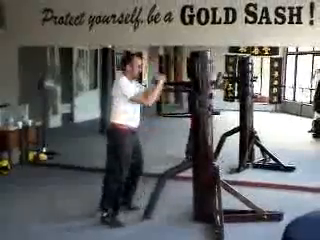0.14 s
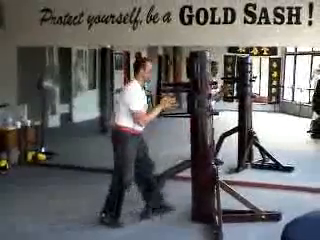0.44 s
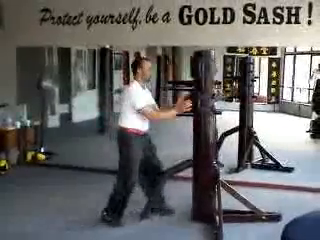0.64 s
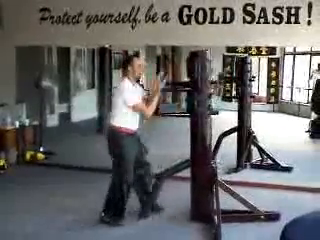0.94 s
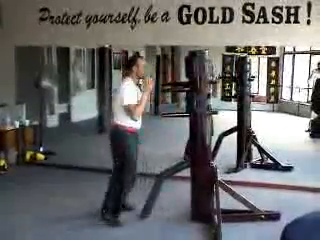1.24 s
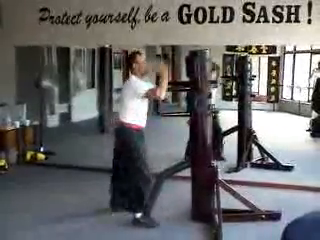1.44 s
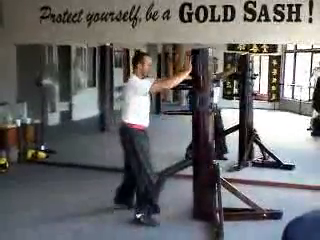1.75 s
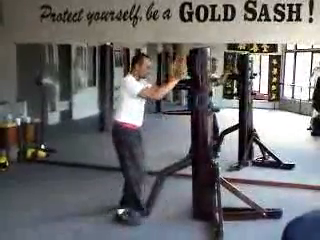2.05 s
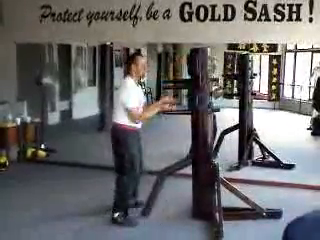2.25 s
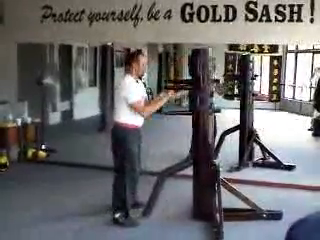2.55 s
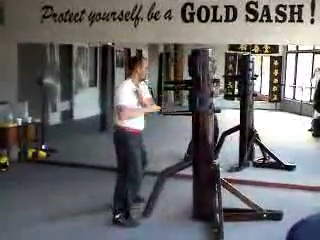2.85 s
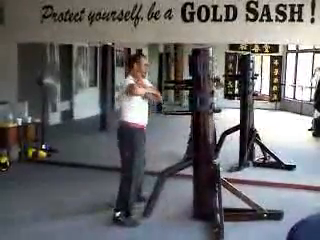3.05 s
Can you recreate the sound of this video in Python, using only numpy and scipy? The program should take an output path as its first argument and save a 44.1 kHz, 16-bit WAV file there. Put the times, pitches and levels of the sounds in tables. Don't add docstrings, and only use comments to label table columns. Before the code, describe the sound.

Sharp wood-on-wood clacks alternate with duller hollow palm thuds in short irregular flurries over about three seconds. A live hall rings after each one above soft low hiss; the stereo pickup squashes and overloads on peaks.

```python
import sys
import numpy as np
from scipy import signal
from scipy.io import wavfile
from scipy.ndimage import uniform_filter1d

SR = 44100
rng = np.random.default_rng(int(sys.argv[2]) if len(sys.argv) > 2 else 0)


def attenuation_scalar(level_db):
    decades = np.asarray(level_db, float) / 20
    return 10 ** decades


def store_pcm(level_fs):
    pcm = np.round(np.clip(level_fs, -1, 1) * 32767).astype(np.int16)
    wavfile.write(sys.argv[1], SR, np.atleast_2d(pcm).T)


N = 141120


def band_pass(order, low_hz, high_hz, x):
    return signal.sosfilt(signal.butter(order, [low_hz, high_hz], "band", fs=SR, output="sos"), x)


def clicks_at(s, db):
    clicks = np.zeros(N) + 1e-18
    clicks[(s * SR).astype(int)] = attenuation_scalar(db)
    return clicks


def struck(modes, s, db, contact_s):
    out = 0
    spread_db = 1.5 * rng.standard_normal((len(s), len(modes)))
    for k, (hz, level_db, t60) in enumerate(modes):
        clicks = clicks_at(s, db + level_db + spread_db[:, k])
        ring_s = min(t60, 0.03 + 30 / hz)
        r = attenuation_scalar(-60 / (ring_s * SR))
        w = 2 * np.pi * hz / SR
        out = out + signal.lfilter([0, np.sin(w)], [1, -2 * r * np.cos(w), r * r], clicks)
    soft = np.exp(-1 / (contact_s * SR))
    return signal.lfilter([(1 - soft) ** 2], [1, -2 * soft, soft ** 2], out)


HARD_S, PALM_S = 0.00005, 0.0001

# f/Hz, level/dB, t60/s
UPPER_ARM_MODES = [(951, -2, 0.08), (1216, -4, 0.0083), (1322, 0.5, 0.012), (2285, -11.5, 0.043),
                   (2213, -9.5, 0.09), (1480, -5.5, 0.0065), (1844, -5.5, 0.0088), (666, -16.5, 0.038),
                   (6100, -21, .01)]
SIDE_ARM_MODES = [(909, 7, 0.032), (650, -37, 0.037), (1080, -24, 0.026), (1346, 16, 0.0067),
                  (1640, -22, 0.007), (1718, 3, 0.019), (2366, -3, 0.033), (3550, -28.5, .01)]
LEG_MODES = [(940, 11.5, 0.015), (745, -31.5, 0.079), (1266, 2.5, 0.024), (1560, -5.5, 0.06),
             (1782, 7, 0.01), (2630, -16, 0.042)]
LOWER_ARM_MODES = [(948, -16, .05), (1030, -23.5, 0.037), (1293, 3.5, 0.028), (1510, -4.5, 0.059),
                   (1674, 2, 0.0067), (2140, -6, 0.028), (2388, 3, 0.0083), (2450, -9, 0.06),
                   (3510, -13, 0.013), (3420, -8, .015), (3670, -19.5, .015)]
# t/s, limb level/dB, trunk level/dB, frame level/dB, crack level/dB
UPPER_ARM_BLOWS = [
    (0.1327, -13, -13, -56.5, 6.5),
    (.142, 12.5, -9, -3, 12.5),
    (.150, 12, -3, -16, 0.5),
    (.156, 7.5, -17.5, -6.5, 11),
]
SIDE_ARM_BLOWS = [
    (1.0927, 3, 1.5, -17.5, 3.5),
    (1.103, 0.5, -7.5, -12, 1),
    (1.124, 4, -27, -17.5, 11),
    (1.137, 4, -7, -3, -11.5),
]
LEG_BLOWS_HEARD = [
    (2.004, -13.5, -33, -16, 8),
    (2.0059, 3.5, -24.5, -3, 1.5),
    (2.017, -4, -27, -6.5, 1),
]
LOWER_ARM_BLOWS = [
    (2.4588, -11.5, -15, -14.5, -11),
    (2.463, 8, -37.5, -45.5, 13),
    (2.476, 17, -16.5, -7, 10.5),
]


def limbs():
    pairs = ((UPPER_ARM_MODES, UPPER_ARM_BLOWS), (SIDE_ARM_MODES, SIDE_ARM_BLOWS),
             (LEG_MODES, LEG_BLOWS_HEARD), (LOWER_ARM_MODES, LOWER_ARM_BLOWS))
    sound = sum(struck(modes, *np.transpose(blows)[:2], HARD_S) for modes, blows in pairs)
    return sound, np.transpose([row for _, blows in pairs for row in blows])


def cracks(s, db):
    clicks = clicks_at(s, db)
    r = np.exp(-1 / (0.0045 * SR))
    swell = signal.lfilter([np.e * (1 - r)], [1, -2 * r, r * r], clicks)
    shared = [[1], [1]] * rng.standard_normal(N)
    burst = swell * (shared + 0.5 * rng.standard_normal((2, N)))
    return band_pass(1, 300, 2960, 10 * clicks), band_pass(1, 300, 2960, burst)


# f/Hz, level/dB, t60/s
TRUNK_MODES = [(575, 0, .07), (535, -11, .05), (625, -11, .05)]
# low f/Hz, high f/Hz
HOLLOW_BAND = [492, 853]


def trunk(s, db):
    return band_pass(2, *HOLLOW_BAND, struck(TRUNK_MODES, s, db, PALM_S))


# f/Hz, level/dB, t60/s
POST_MODES = [(212, -12, 0.028), (298, -7, 0.07), (353, -8.5, 0.037), (469.4, -4, 0.019), (519, -7, 0.01),
              (677, -1, 0.021), (879, -1.5, 0.029), (1080, -3, 0.0099), (1370, -3.5, 0.013),
              (1750, -11, 0.018), (4680, 0.5, .01)]


def post(s, db):
    return struck(POST_MODES, s, db, HARD_S)


# f/Hz, level/dB, t60/s
FRAME_MODES = [(210, -3.5, 0.02), (282, 0, 0.068), (311.7, -3.5, 0.089), (380, -2, 0.034)]


def frame(s, db):
    return struck(FRAME_MODES, s, db, PALM_S)


# f/Hz, level/dB, t60/s
STAND_MODES = [(86.4, -2, 0.22), (101.5, -5, 0.14), (154, -5.5, 0.017)]


def stand(s, db):
    return struck(STAND_MODES, s, db, PALM_S)


# t/s, hollow level/dB, post level/dB, stand level/dB, crack level/dB
PALM_BLOWS = [(0.602, -18.5, -14, -16, 1.5), (.611, -19.5, -3.5, -21.5, -13),
              (.633, -32.5, -11.5, -40.5, -15), (.664, -9, -28.5, -30.5, -15.5),
              (.684, -14, -32, -38.5, -19.5), (.722, -10, -5.5, -31.5, -28.5), (0.86, -16.5, -13, -29, -13),
              (0.871, -8.5, -6.5, -44, -22), (1.572, -18, -8.5, -15, -4.5), (1.582, -14.5, -4, -13, 5.5),
              (1.594, -10, -0.5, -16.5, -9.5), (1.644, -8, -7.5, -26, -12.5),
              (1.669, -14, -1.5, -23, -29.5), (2.737, -6, -7.5, -43, -10.5)]


def dummy():
    arms, knocks = limbs()
    knock_s, _, knock_hollow_db, frame_db, knock_crack_db = knocks
    palm_s, palm_hollow_db, post_db, stand_db, palm_crack_db = np.transpose(PALM_BLOWS)
    s = np.hstack([knock_s, palm_s])
    hollow = trunk(s, np.hstack([knock_hollow_db, palm_hollow_db]))
    snap, scatter = cracks(s, np.hstack([knock_crack_db, palm_crack_db]))
    wood = arms + hollow + frame(knock_s, frame_db) + post(palm_s, post_db)
    thump = stand(palm_s, stand_db)
    no_lows = signal.butter(4, 205, "high", fs=SR, output="sos")
    direct = signal.sosfilt(no_lows, wood + attenuation_scalar(11) * hollow) + thump
    feed = signal.sosfilt(no_lows, wood + snap) + thump
    return attenuation_scalar(-6.5) * direct + attenuation_scalar(-12.5) * scatter, feed


def at_hz(points, hz):
    table = np.array(points)
    return np.interp(np.log(hz), np.log(table[:, 0]), table[:, 1])


# f/Hz, likeness/0-1
LEFT_RIGHT_LIKENESS = [(25, 0.43), (60, 1), (250, 0.97), (500, 0.91), (1000, 0.68), (2000, 0.63),
                       (4000, 0.56), (8000, 0.1)]


def bands(shape, size):
    out = 0
    edges = 22 * 2 ** np.arange(0, 9.1, 0.5)
    white = rng.standard_normal((2, 2, size + SR // 2))
    for k, (low, high) in enumerate(zip(edges, edges[1:])):
        mid, side = band_pass(2, low, high, white[k % 2])[:, SR // 2:]
        hz = np.sqrt(low * high)
        alike = np.clip(at_hz(LEFT_RIGHT_LIKENESS, hz), 0, 1)
        out = out + shape(hz) * (np.sqrt(1 + alike) * mid + np.sqrt(1 - alike) * side * [[1], [-1]])
    return out


# f/Hz, t60/s
HALL_DECAY = [(60, 0.7), (250, 0.6), (1000, 0.82), (3000, 0.87), (8000, 0.29)]


def hall(x):
    t = np.arange(2 * SR) / SR
    echoes = bands(lambda hz: attenuation_scalar(-60 * t / at_hz(HALL_DECAY, hz)), size=2 * SR)
    echoes = echoes * (1 - np.exp(-t / 0.011))
    echoes = echoes / np.sqrt(np.sum(echoes ** 2) / 2)
    return signal.fftconvolve(x[None], echoes, axes=1)[:, :N]


# f/Hz, level/dB per Hz
ROOM_SPECTRUM = [(22, -14), (50, -11.5), (110, -13.5), (240, -12), (540, -22), (1300, -24.5), (5000, -42),
                 (6500, -36.5), (9000, -36.5)]


def room():
    hiss = bands(lambda hz: attenuation_scalar(at_hz(ROOM_SPECTRUM, hz)), size=N)
    return hiss / np.sqrt(np.mean(hiss ** 2) + 1e-20)


def scene():
    direct, feed = dummy()
    return direct + attenuation_scalar(-1.5) * hall(feed) + attenuation_scalar(-32.5) * room()


def limiter(x):
    limit_db, squash, attack_s, release_db_per_s = -6.5, 0.85, 0.005, 92.5
    window = int(0.003 * SR)
    power = uniform_filter1d(np.mean(x ** 2, axis=0), window, origin=(window - 1) // 2)
    level_db = 10 * np.log10(power.clip(1e-12))
    fall = release_db_per_s * np.arange(N) / SR
    held_db = np.maximum.accumulate(level_db + fall) - fall
    over_db = np.maximum(held_db - limit_db, 0)
    r = np.exp(-1 / (attack_s * SR))
    return x * attenuation_scalar(-squash * signal.lfilter([1 - r], [1, -r], over_db))


def low_pass(x):
    return signal.sosfilt(signal.butter(12, 8670, fs=SR, output="sos"), x)


def record(dry):
    x = np.clip(limiter(dry), -1.3, 1.3)
    x = signal.sosfilt(signal.cheby2(12, 60, 8400, fs=SR, output="sos"), x)
    return low_pass(np.clip(x, -1, 1))


dry = scene()
out = record(dry)
store_pcm(out)
```